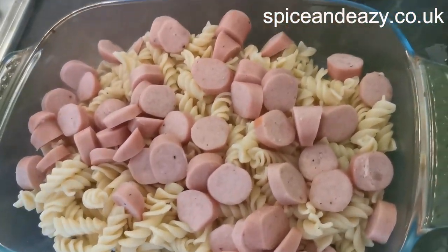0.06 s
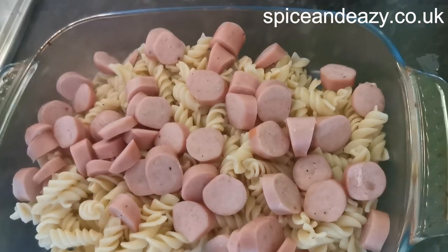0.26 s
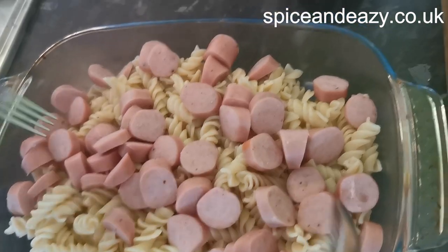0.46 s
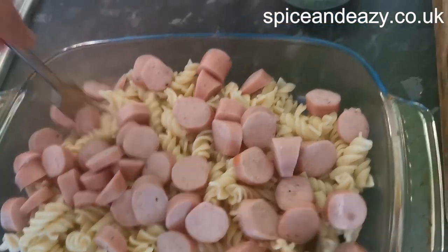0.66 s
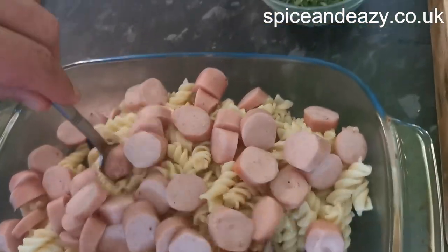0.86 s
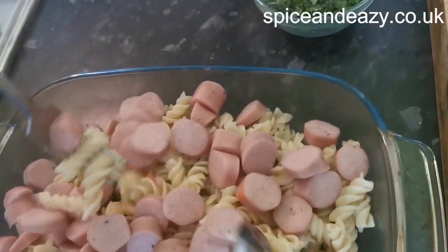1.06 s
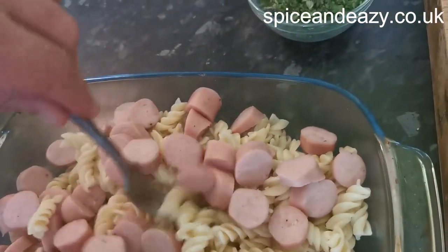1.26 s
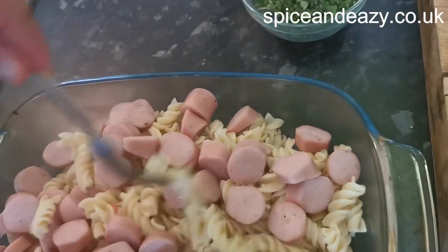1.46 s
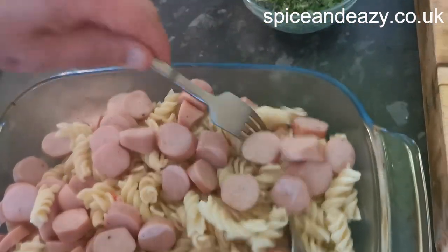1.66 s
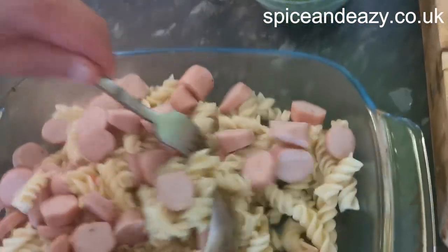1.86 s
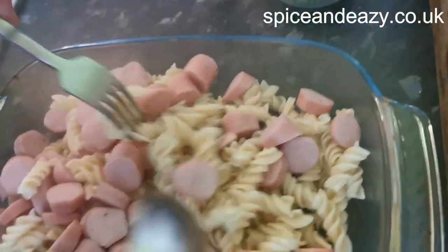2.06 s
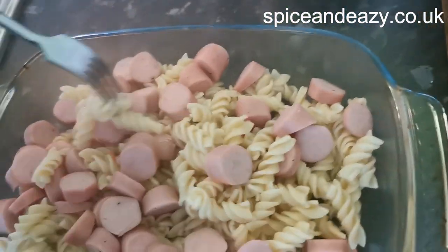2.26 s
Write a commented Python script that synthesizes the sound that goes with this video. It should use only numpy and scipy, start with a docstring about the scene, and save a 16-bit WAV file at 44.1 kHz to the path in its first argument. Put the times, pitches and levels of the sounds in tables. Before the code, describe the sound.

A spoon knocks and clinks in a glass dish of pasta after a heavy thump.

```python
"""A low rumble, over the hum of an appliance, ends in a heavy knock that booms in a kitchen worktop.
A bright hiss swells and sinks back. Pasta is being stirred in a glass baking dish: a spoon strikes the
glass, bounces and sings as it slides, and the wet food ticks as it parts. Then cutlery clicks, squeaks
as it sticks and slips on the glass, and taps the rim. It all happens close to a phone in a small room."""
import sys
import numpy as np
from scipy import signal
from scipy.fft import rfft, irfft, next_fast_len
from scipy.io import wavfile

SR = 44100
rng = np.random.default_rng(int(sys.argv[2]) if len(sys.argv) > 2 else 0)


def transcribe(u):
    """Save the signal u as a 16-bit wav file named by the first command-line argument.

    u: samples, shape (n,) or (channels, n), limited to [-1, 1]; the rate is SR.
    q: integer samples, one column per channel.
    """
    v = np.clip(np.atleast_2d(u).T, -1, 1)
    q = np.round(v * 32767).astype(np.int16)
    wavfile.write(sys.argv[1], SR, q)


N = 101429


def undb(db):
    """Turn decibels into a gain."""
    return 10 ** (np.asarray(db) / 20)


def clock():
    """The time of every sample, in seconds."""
    return np.arange(N) / SR


def decay(age, t60):
    """Die away by 60 dB in t60 seconds: the 'fade time' in the tables."""
    return np.exp(-np.log(1000) * age / t60)


def fade(start, t60, attack):
    """Rise quickly, then die away."""
    age = np.maximum(clock() - start, 0)
    return np.minimum(age / attack, 1) * decay(age, t60)


def swell(levels):
    """A gain that follows (time [s], level [dB]) points."""
    return undb(np.interp(clock(), *np.array(levels).T))


def colour_gains(colour, size):
    """A gain for each frequency, from a 'colour': (frequency [Hz], level [dB]) points."""
    hz, db = np.array(colour, float).T
    freqs = np.maximum(np.arange(size // 2 + 1) * SR / size, 1)
    return undb(np.interp(np.log(freqs), np.log(hz), db))


def noise(colour, alike_below_hz=840):
    """Coloured noise of strength 1 at two microphones: alike in the bass, unrelated in the treble."""
    size = next_fast_len(N, real=True)
    freqs = np.maximum(np.arange(size // 2 + 1) * SR / size, 1)
    left, other = rfft(rng.standard_normal((2, size)))
    alike = 1 / (1 + (freqs / alike_below_hz) ** 2)
    right = alike * left + np.sqrt(1 - alike ** 2) * other
    x = irfft(np.array([left, right]) * colour_gains(colour, size), size)[:, :N]
    return x / x.std()


def bursts(blows, colour, attack=0.00078):
    """Blows (time [s], level [dB], fade time [s]) wake so many tones that they blur into noise."""
    return noise(colour) * sum(undb(db) * fade(start, t60, attack) for start, db, t60 in blows)


def waver(age, turns_per_s=95):
    """A smooth random wobble for each microphone."""
    turns = rng.standard_normal((2, int(N / SR * turns_per_s) + 2))
    return np.array([np.interp(age * turns_per_s, np.arange(len(side)), side) for side in turns])


def ring(start, tones, attack=0.00068, waver_db=3, waver_rad=.45):
    """The fading tones of a struck object; they waver as food and spoon press on it."""
    age = np.arange(N - int(start * SR)) / SR
    out = np.zeros((2, N))
    for hz, db, t60 in tones:
        depth = min(hz / 1500, 1)  # high tones waver most
        level = undb(db + depth * waver_db * waver(age)) * np.minimum(age / attack, 1) * decay(age, t60)
        phase = 2 * np.pi * hz * age + depth * waver_rad * waver(age)
        out[:, N - len(age):] += level * np.sin(phase)
    return out


def kitchen(x, wet_db, low_t60=0.42, treble_t60=.3, build_s=0.0084):
    """A sound plus its echo, at level wet_db, in a small hard room where treble fades sooner."""
    age = np.arange(SR) / SR
    echoes = rng.standard_normal((2, SR))
    low = signal.sosfiltfilt(signal.butter(2, 3000, fs=SR, output="sos"), echoes)
    tail = low * decay(age, low_t60) + (echoes - low) * decay(age, treble_t60)
    tail *= 1 - np.exp(-age / build_s)
    tail /= np.sqrt(np.sum(tail ** 2, axis=1, keepdims=True))
    return x + undb(wet_db) * signal.fftconvolve(x[:1], tail, axes=1)[:, :N]


# how loud the rumble is (time [s], level [dB])
RUMBLE_LEVEL = [(0, -29), (.04, -37), (.08, -31), (.13, -36.5), (.2, -39), (.25, -45), (.45, -54),
                (.6, -80.5)]
# its deep colour (frequency [Hz], level [dB])
RUMBLE_COLOUR = [(20, -14.5), (45, -5.5), (90, -14), (145, 6.5), (190, -9), (250, 3), (340, -23.5),
                 (700, -28.5), (1500, -41.5), (5000, -49.5)]
def rumble():
    """A low, uneven rumble leads up to the knock and dies away under it."""
    return noise(RUMBLE_COLOUR) * swell(RUMBLE_LEVEL)


# colour of the room's air (frequency [Hz], level [dB])
AIR_COLOUR = [(25, -1), (101, -9.5), (204, -11), (605, -20), (751, -17.5), (1000, -26.5), (1840, -27.5),
              (8000, -48.5), (10400, -76), (17600, -120)]
# the appliance's tones (pitch [Hz], level [dB])
HUM_TONES = [(102, -72), (199.5, -68), (742.5, -70.5)]
def background(air_db=-58, whine_hz=5846, whine_db=-68):
    """Room air, the steady hum of an appliance and a faint whine that dies away."""
    hum = sum(undb(db) * np.sqrt(2) * np.sin(2 * np.pi * (hz * clock() + rng.random()))
              for hz, db in HUM_TONES)
    whine = undb(whine_db) * fade(0, t60=0.7, attack=.0006) * np.sin(2 * np.pi * whine_hz * clock())
    return undb(air_db) * noise(AIR_COLOUR) + hum + whine


# the knock's three quick blows (time [s], level [dB], fade time [s])
KNOCKS = [(0.2278, -19, 0.081), (0.2342, -7.5, 0.028), (0.2445, -21, 0.092)]
# their colour (frequency [Hz], level [dB])
KNOCK_COLOUR = [(100, -1), (300, -4), (700, 0.5), (1050, -6.5), (2400, -7), (3300, -17), (5000, -22.5),
                (7500, -33.5), (15000, -39)]
# colour of the main blow's crack (frequency [Hz], level [dB])
CRACK_COLOUR = [(300, -11), (700, 1), (2000, -8), (5200, -14), (8000, -39)]
# what the knock rings with (pitch [Hz], level [dB], fade time [s])
KNOCK_TONES = [(287.4, -28.5, 0.45), (432, -23.5, 0.33), (661.5, -24.5, .26), (700, -26, .25),
               (735, -26.5, 0.42), (2053, -32, 0.43)]
# low thumps as things settle (time [s], level [dB])
THUMPS = [(0.232, -5.5), (0.2601, 3), (0.397, -12.5), (0.445, -25.5), (0.488, -23.5)]
# the worktop's boom (pitch [Hz], level [dB], fade time [s])
BOOM_TONES = [(51, -25.5, 0.41), (90, -19.5, 0.4), (125.1, -5, .075), (152.1, -16.5, 0.2), (183.4, -25, .2)]
def knock(crack_db=-10.5, crack_t60=0.018):
    """A heavy knock cracks and sets the struck thing ringing; the worktop booms at each thump."""
    start = KNOCKS[1][0]  # the hardest blow
    boom = sum(undb(db) * ring(time, BOOM_TONES, attack=0.01) for time, db in THUMPS)
    crack = bursts([(start, crack_db, crack_t60)], CRACK_COLOUR)
    blows = kitchen(bursts(KNOCKS, KNOCK_COLOUR), wet_db=-3)
    return ring(start, KNOCK_TONES) + boom + crack + blows


# how loud the hiss is (time [s], level [dB])
HISS_LEVEL = [(0, -67), (.1, -57), (.2, -66.5), (.226, -57), (.24, -37.5), (.3, -30), (.4, -43.5),
              (.52, -65), (.62, -64), (.95, -63), (1.2, -74), (1.3, -65.5), (1.55, -74), (1.78, -63),
              (2.05, -67), (2.3, -76.5)]
# its bright colour (frequency [Hz], level [dB])
HISS_COLOUR = [(2000, -33), (4000, -8.5), (7800, -13), (8700, 0), (11000, 2.5), (12800, -6.5),
               (14000, -8.5), (16000, -13.5)]
def hiss():
    """A bright hiss swells just after the knock and stays faintly under the stirring."""
    return noise(HISS_COLOUR) * swell(HISS_LEVEL)


# the spoon's strikes (time [s], glass level [dB], contact level [dB], spoon level [dB], thud level [dB])
CLINKS = [(0.6305, -3, -21, -25.5, -69.5), (0.6356, -14.5, -19.5, -17.5, -64.5),
          (0.7338, -24, -51, -22.5, -39.5), (0.7412, -43, -37.5, -35, -56.5)]
# the glass dish's ring (pitch [Hz], level [dB], fade time [s])
GLASS_TONES = [(460, -30, .12), (765, -30, .16), (1400, -23, .07), (1562, -28.5, .31), (1592, -24, .19),
               (2261, -27.5, .18), (2371, -23.5, .18), (2775, -29, .18), (3355, -33, .42), (4640, -41, .46),
               (4930, -37, .34)]
# colour of metal meeting glass (frequency [Hz], level [dB])
CONTACT_COLOUR = [(250, -26.5), (440, -3), (620, -5), (1100, -8), (1500, 0), (1900, -8), (2600, 0.5),
                  (3900, -12.5), (5000, -8.5), (6200, -20.5), (7500, -9), (15000, -15)]
# colour of the spoon's shimmer (frequency [Hz], level [dB])
SPOON_COLOUR = [(4000, -33), (8000, -25), (8700, 2), (11500, 1), (12700, -4.5), (13700, -16.5),
                (15500, -16.5)]
# the spoon's own ring (pitch [Hz], level [dB])
SPOON_TONES = [(8664, -10), (9020, -10.5), (9210, -11), (9400, -12), (9895, -9), (10660, -10), (11225, -9),
               (11400, -12), (11535, -8.5), (12080, -13.5), (12940, -17.5)]
# colour of the dish's soft thud (frequency [Hz], level [dB])
THUD_COLOUR = [(40, -25.5), (100, -10), (160, 4), (230, -15.5), (600, -31)]
def clinks(contact_t60=.08, shimmer_t60=0.075, spoon_t60=.15, thud_t60=0.3, muffled_at_s=1, spread_db=3):
    """The spoon strikes and bounces: it rings brightly, and the dish thuds and rings too."""
    glass = sum(undb(db) * ring(time, GLASS_TONES) for time, db, _, _, _ in CLINKS)
    glass *= decay(np.maximum(clock() - muffled_at_s, 0), t60=0.091)  # food muffles the glass
    contact = bursts([(time, db, contact_t60) for time, _, db, _, _ in CLINKS], CONTACT_COLOUR)
    spoon = bursts([(time, db, shimmer_t60) for time, _, _, db, _ in CLINKS], SPOON_COLOUR)
    for time, _, _, strike_db, _ in CLINKS:
        # each strike lands on another spot and favours other tones
        tones = [(hz, db + spread_db * rng.standard_normal(), spoon_t60) for hz, db in SPOON_TONES]
        spoon += undb(strike_db) * ring(time, tones)
    thud = bursts([(time, db, thud_t60) for time, _, _, _, db in CLINKS], THUD_COLOUR, attack=0.01)
    return kitchen(glass, wet_db=-7) + kitchen(contact, wet_db=-6) + kitchen(spoon, wet_db=-9.5) + thud


def slide(start=.655, level_db=-32, start_hz=2710, end_hz=2270, sink_s=0.022):
    """The spoon sings on the glass as it slides, sinking in pitch."""
    age = np.maximum(clock() - start, 0)
    hz = end_hz + (start_hz - end_hz) * np.exp(-age / sink_s)
    tone = undb(level_db) * fade(start, t60=.3, attack=0.06) * np.sin(2 * np.pi * np.cumsum(hz) / SR)
    return kitchen(np.array([tone, tone]), wet_db=-7)


# ticks of wet food (time [s], level [dB])
TICKS = [(0.9345, -41.5), (0.9662, -47.5), (1.0385, -48.5), (1.046, -53.5), (1.395, -48), (1.6893, -47),
         (1.87, -41), (1.891, -42)]
# their thin, high colour (frequency [Hz], level [dB])
TICK_COLOUR = [(1000, -28), (4000, -14.5), (7800, -13), (9000, 8), (12500, -0.5), (15500, -12)]
def food(tick_t60=0.019):
    """Wet pasta ticks as it parts."""
    ticks = bursts([(time, db, tick_t60) for time, db in TICKS], TICK_COLOUR, attack=0.00068)
    return kitchen(ticks, wet_db=-10.5)


# fork hitting spoon (time [s], level [dB], fade time [s])
CLICKS = [(1.8056, -23, 0.027)]
# colour of that click (frequency [Hz], level [dB])
CLICK_COLOUR = [(100, -12.5), (330, -12.5), (470, -10), (640, -27), (830, -3.5), (1150, -18), (1950, -19),
                (2400, 4.5), (3100, -15.5), (4000, -3), (5500, -9.5), (7500, -14), (9300, -7.5),
                (11500, -24.5), (14000, -45)]
# the fork's ring (pitch [Hz], level [dB], fade time [s])
FORK_TONES = [(800, -32, .05), (1392, -39, 0.14), (2400, -27, 0.033), (2740, -27, 0.03), (3340, -33, .075),
              (3960, -24, .028), (4880, -28, 0.055), (6020, -35, 0.055), (8680, -28, .055),
              (9620, -31, .04)]
# colour of the dish's dull knock (frequency [Hz], level [dB])
DISH_COLOUR = [(50, -24), (110, -7.5), (380, -7.5), (600, -19.5), (1500, -39)]
def fork_click(dish_db=-44.5, dish_t60=0.32):
    """The fork clicks against the spoon, over a dull knock of the full dish."""
    start = CLICKS[0][0]
    click = bursts(CLICKS, CLICK_COLOUR) + ring(start, FORK_TONES)
    dish = bursts([(start, dish_db, dish_t60)], DISH_COLOUR)
    return kitchen(click, wet_db=-8.5) + dish


# the squeak's tone, then its octave (left level [dB], right level [dB], echo level [dB])
SQUEAK_TONES = [(-21.5, -61.5, -5.5), (-19, -26.5, -15.5)]
def squeak(peak_s=1.8525, rise_s=0.0055, release_s=0.008, pitch_hz=4380, sag_hz_per_s=5800):
    """Metal sticks and slips on the glass for an instant, making a high tone that sags."""
    age = clock() - peak_s
    hz = pitch_hz - sag_hz_per_s * np.minimum(age, rise_s)
    phase = 2 * np.pi * np.cumsum(hz) / SR
    loudness = np.exp(-np.where(age < 0, (age / rise_s) ** 2, age / release_s))
    return sum(kitchen(undb([[left_db], [right_db]]) * loudness * np.sin(multiple * phase), wet_db)
               for multiple, (left_db, right_db, wet_db) in enumerate(SQUEAK_TONES, start=1))


# the rim's short ring (pitch [Hz], level [dB], fade time [s])
RIM_TONES = [(2350, -34, 0.065), (2420, -30.5, 0.026), (2810, -42, 0.073)]
def rim_tap(start=1.9288):
    """Cutlery taps the rim softly, and it rings for a moment."""
    return kitchen(ring(start, RIM_TONES, attack=.002), wet_db=-15.5)


def scene():
    """All the sounds added together, in left and right channels."""
    return (rumble() + background() + knock() + hiss() + clinks() + slide()
            + food() + fork_click() + squeak() + rim_tap())


# the right microphone compared with the left (frequency [Hz], level [dB])
RIGHT_MIC = [(60, -2.5), (280, -2), (700, -9), (1300, -6.5), (2400, -1.5), (7500, -2), (8800, -23),
             (15000, -22)]
def record(dry, low_cut_hz=26, top_hz=16000):
    """The right microphone is quieter and duller; the phone cuts the deepest bass and the very top."""
    right = irfft(rfft(dry[1]) * colour_gains(RIGHT_MIC, N), N)
    both = np.array([dry[0], right])
    both = signal.sosfilt(signal.butter(2, low_cut_hz, "high", fs=SR, output="sos"), both)
    return signal.sosfilt(signal.ellip(8, .2, 70, top_hz, fs=SR, output="sos"), both)


dry = scene()
out = record(dry)
transcribe(out)
```